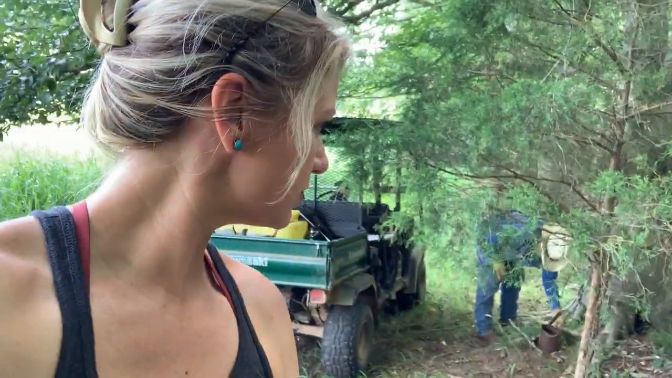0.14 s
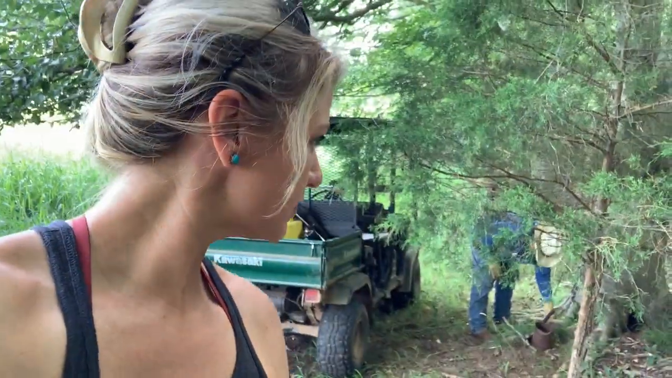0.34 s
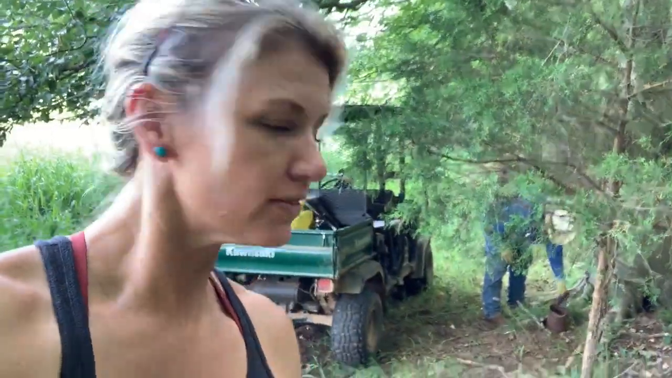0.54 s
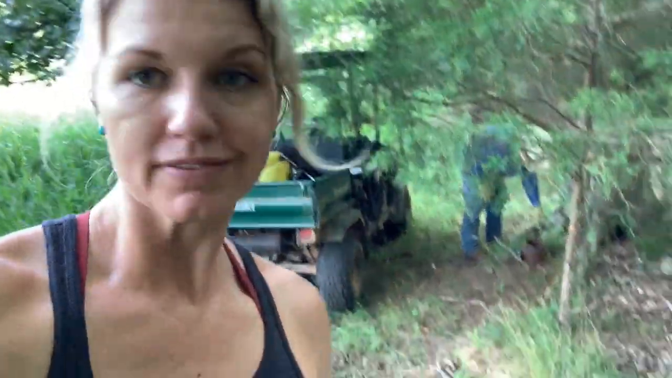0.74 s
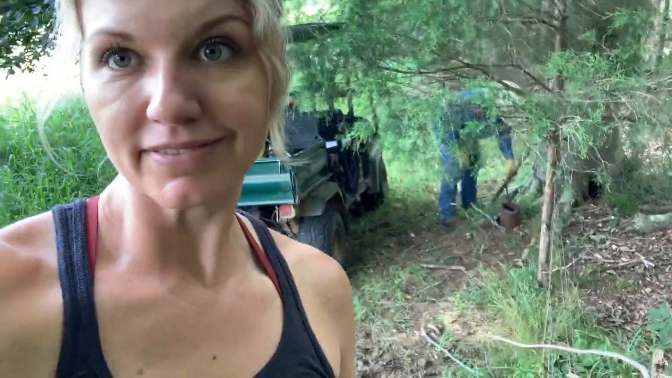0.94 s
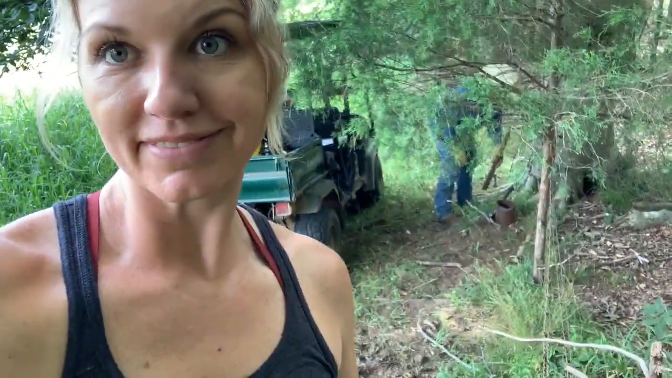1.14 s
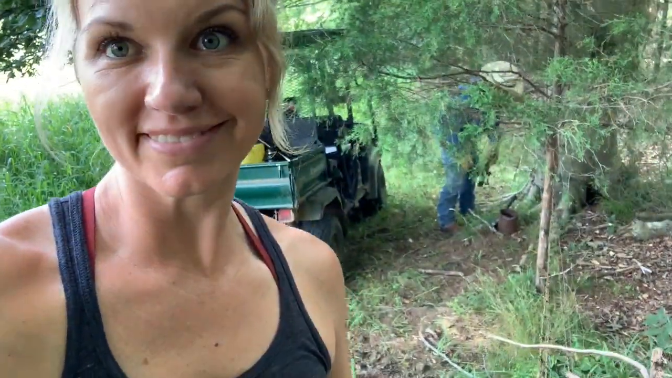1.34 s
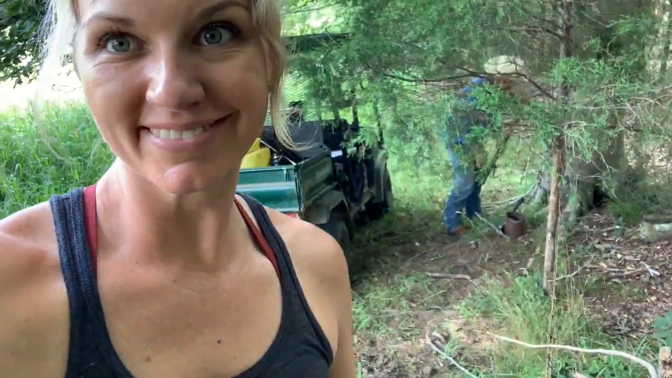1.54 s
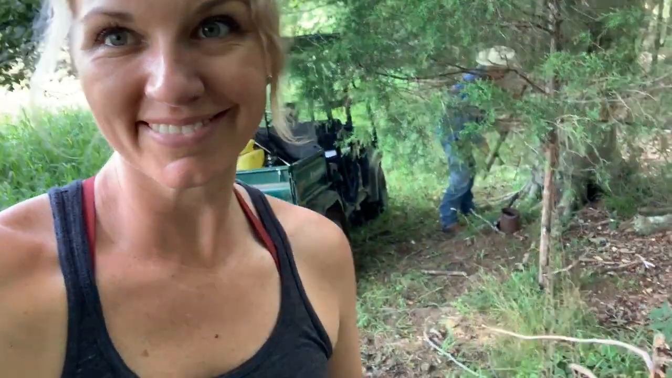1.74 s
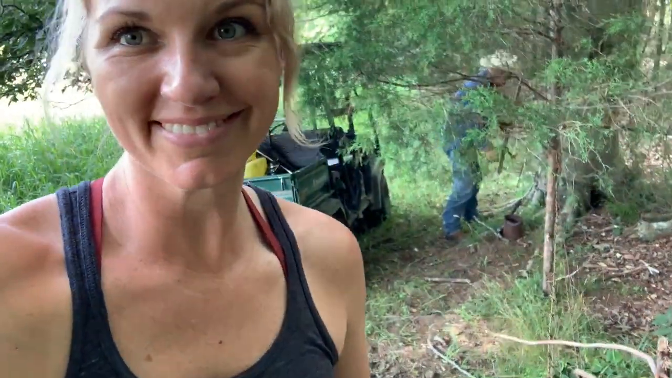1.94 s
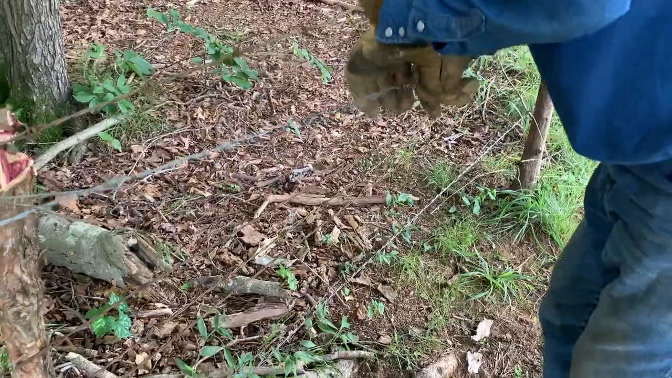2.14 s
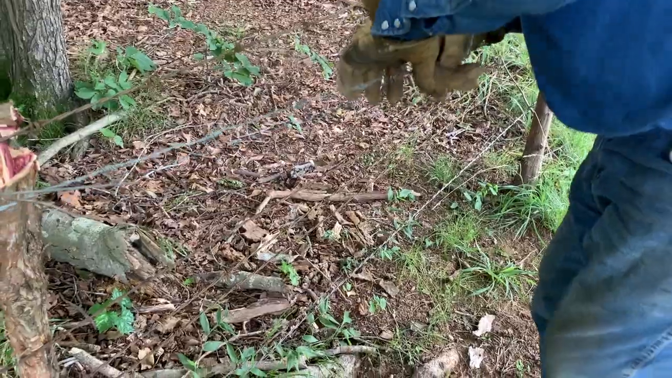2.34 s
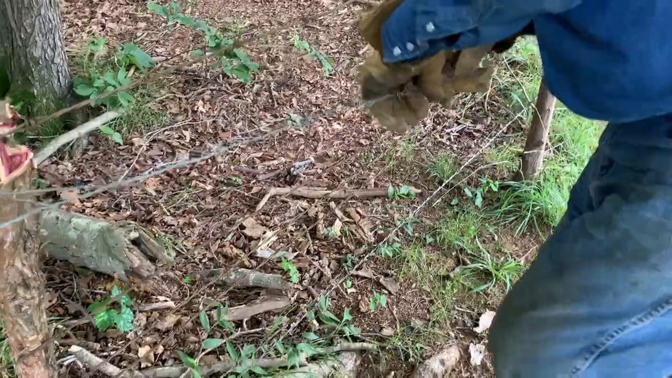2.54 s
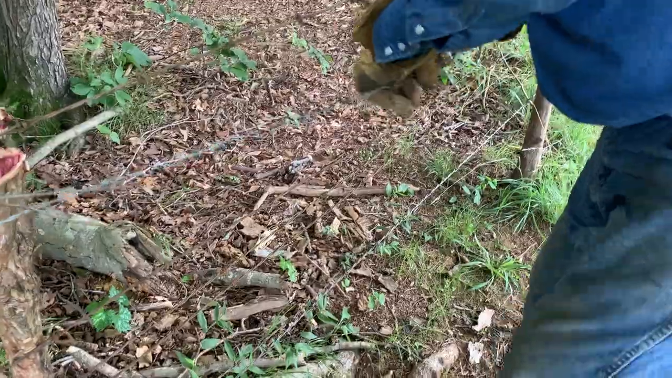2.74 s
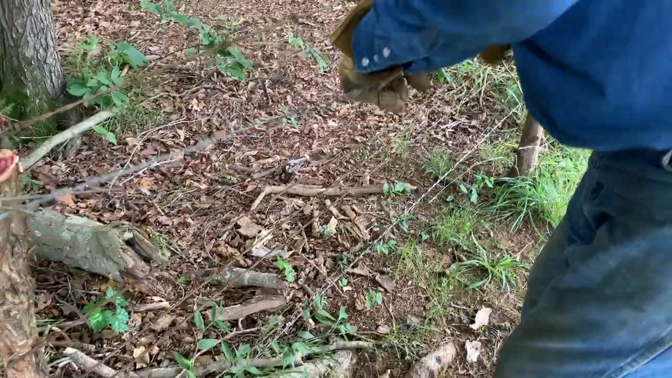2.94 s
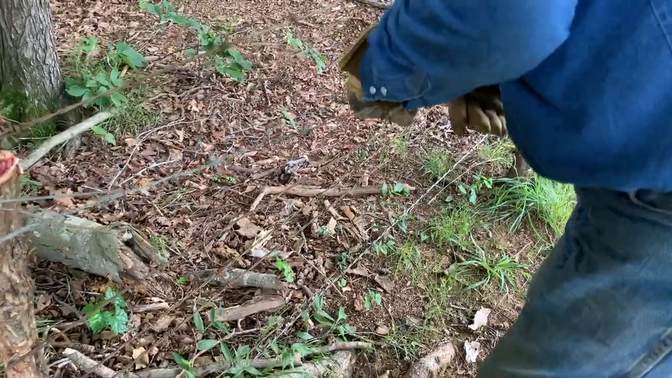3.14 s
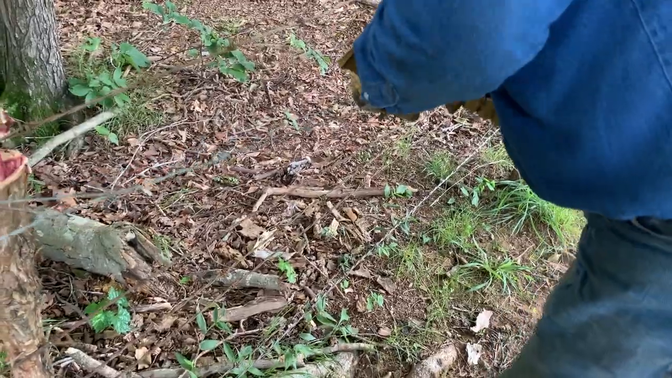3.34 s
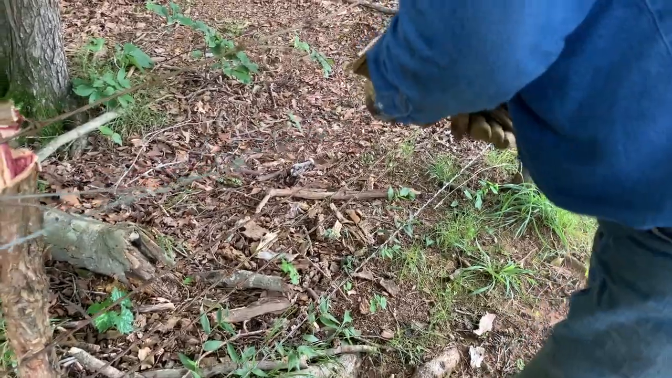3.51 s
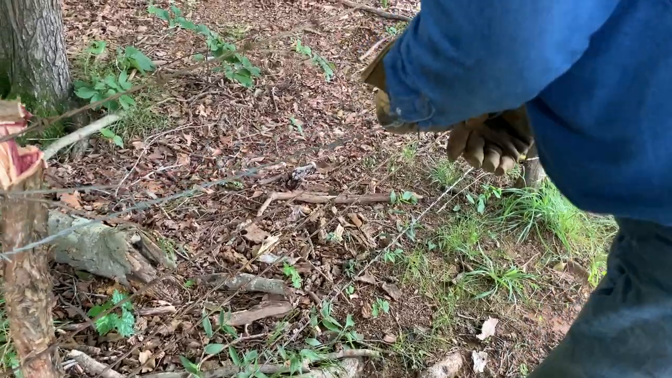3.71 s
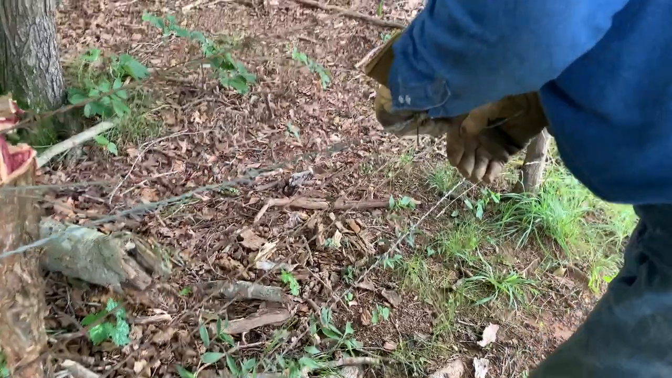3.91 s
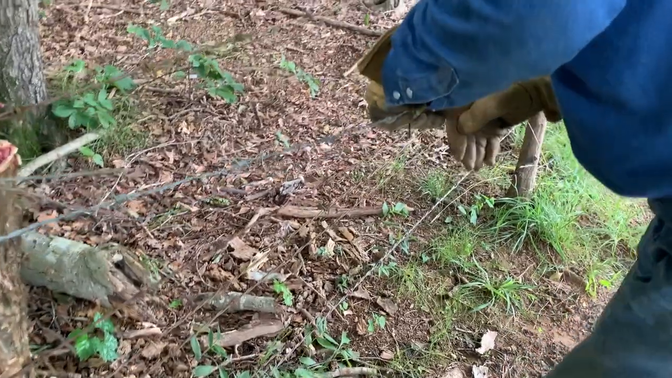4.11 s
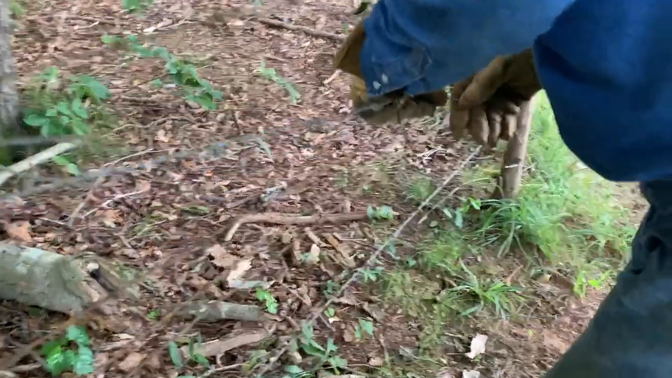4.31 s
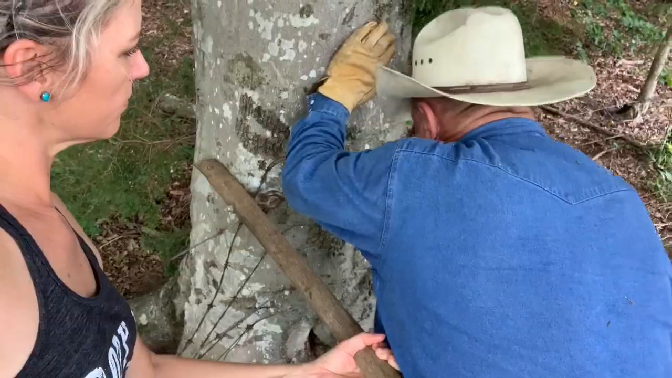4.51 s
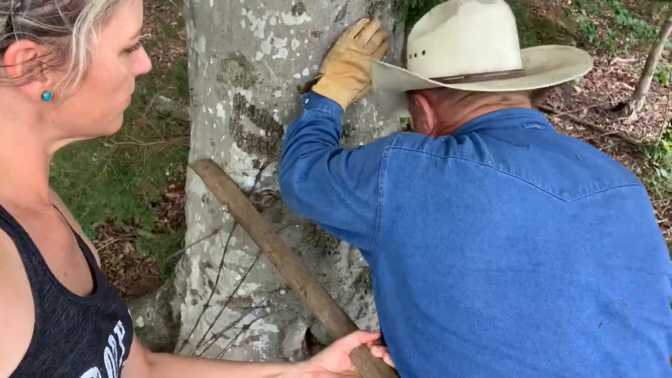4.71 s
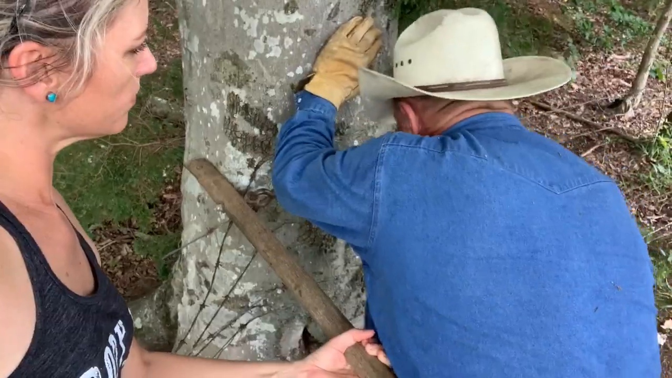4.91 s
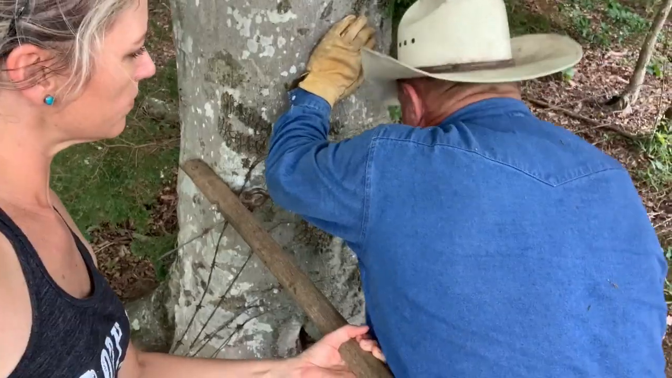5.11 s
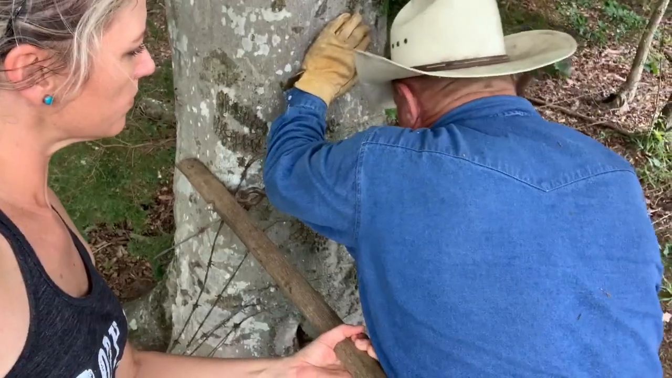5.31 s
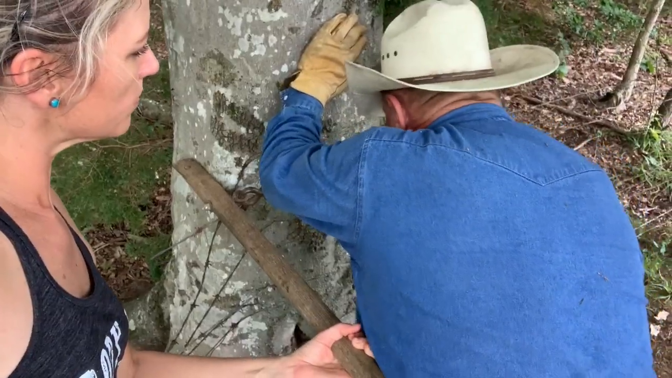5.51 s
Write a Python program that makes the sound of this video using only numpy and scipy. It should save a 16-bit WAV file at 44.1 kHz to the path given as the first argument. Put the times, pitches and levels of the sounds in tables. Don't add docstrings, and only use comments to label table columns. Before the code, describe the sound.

A quiet woodland heard through a phone in stereo, with soft air, low wind rumble and faint high insect hiss. From 0 to 0.3 s a nearer bird gives two quick dipping whistles among blurred distant birdsong; small dull wood knocks follow around 0.5 to 0.6 s. From 1.0 to 1.6 s a second phrase of whistles rises with a hoarse low call, then thin wire ticks near 1.8 to 1.9 s. At 2.0 s the scene cuts to gloved wire work: woody knocks at 2.36, 2.43 and 2.64 s, bright snapping ticks and a rustle around 2.6 to 2.8 s, another scrape near 3.3 to 3.4 s, a crisp tick at 4.0 s, birds faint behind. At 4.44 s it cuts to the ringing tail of a hammer blow. Loud, sharp steel cracks land at 5.0 and 5.6 s, with a short trunk ring and tree echo; between them only quiet air and a faint far trill.

```python
import sys
import numpy as np
from scipy import signal
from scipy.fft import rfft, irfft, next_fast_len
from scipy.io import wavfile
from scipy.ndimage import uniform_filter1d

SR = 44100
rng = np.random.default_rng(int(sys.argv[2]) if len(sys.argv) > 2 else 0)


def to_linear_factor(level_db):
    exponent = np.asarray(level_db, float) / 20
    return 10 ** exponent


def dump_mix(stems):
    frames = np.atleast_2d(stems).T
    limited = np.clip(frames, -1, 1)
    pcm = np.round(limited * 32767).astype(np.int16)
    wavfile.write(sys.argv[1], SR, pcm)


N = 249738


def evened(x):
    return x / np.sqrt(np.mean(x ** 2) + 1e-20)


def read(points, hz, column=1):
    rows = np.array(points).T
    return np.interp(np.log(hz + 1), np.log(rows[0] + 1), rows[column])


def add(mix, s, sound):
    part = mix[:, round(s * SR):][:, :sound.shape[-1]]
    part += sound[..., :part.shape[1]]


def coloured(x, points):
    size = next_fast_len(x.shape[-1])
    hz = np.fft.rfftfreq(size, 1 / SR)
    return evened(irfft(rfft(x, size) * to_linear_factor(read(points, hz)), size)[..., :x.shape[-1]])


def drift(shape, bins, frames):
    field = uniform_filter1d(rng.standard_normal(shape), bins, axis=0)
    return evened(uniform_filter1d(field, frames, axis=1))


def patchy(patchy_db, size=(6, 10)):
    z = signal.stft(rng.standard_normal((2, N)), nperseg=512)[2]
    patches = drift(z.shape[1:], *size)
    return signal.istft(z * to_linear_factor(patchy_db * patches), nperseg=512)[1][:, :N]


def resonate(x, hz, width_hz):
    turn = np.exp(2j * np.pi * np.cumsum(hz) / SR)
    r = np.exp(-np.pi * width_hz / SR)
    return 2 * (turn * signal.lfilter([1 - r], [1, -r], x / turn)).real


def blurred(level_db, hz, width_hz, patchy_db):
    hz = hz * np.ones(N)
    streaks = patchy(patchy_db, size=(3, 9))
    return to_linear_factor(level_db) * evened(resonate(resonate(streaks, hz, width_hz), hz, width_hz))


def swells(rows):
    rows, t = np.array(rows), np.arange(0, N + 64, 64) / SR
    late = t - rows[:, :1]
    db = rows[:, 1:2] - 21.5 * np.maximum(-late / rows[:, 2:3], late / rows[:, 3:4])
    last = uniform_filter1d(rows[db.argmax(axis=0), -1], size=30)
    return [np.interp(np.arange(N) / SR, t, v) for v in (db.max(axis=0), last)]


CUT_S = [2.004, 4.442]


def takes(fade_s=0.0073):
    t = np.arange(N) / SR
    first, second = (np.clip((t - s) / fade_s, 0, 1) for s in CUT_S)
    return np.array([1 - first, first - second, second])


# frequency in Hz, density in dB per Hz.
AIR_SPECTRA = [
    [(18, -81), (30, -12), (64, 0), (123, -25.5), (162, -23), (448, -24.5), (1560, -29.5), (2780, -34.5),
     (2980, -31), (7500, -32), (9750, -111), (16500, -120)],
    [(18, -29), (30, -22), (93, 2), (458, -18), (694, -32.5), (1130, -32), (1420, -20), (1710, -38),
     (4110, -23), (7500, -44), (9750, -76), (16500, -120)],
    [(18, -33), (30, 3.5), (251, -10.5), (355, -17.5), (744, -8), (1420, -26.5), (2530, -19.5),
     (3190, -22.5), (4840, -29), (7500, -38), (9750, -61.5), (16500, -120)],
]
AIR_LEVEL_DB = [-64, -60.5, -61.5]
# frequency in Hz, density in dB per Hz.
INSECT_SPECTRA = [
    [(7000, -53), (8000, -15.5), (9000, -24), (9800, 2), (10500, -13.5), (11500, -25), (13000, -13.5),
     (14500, -6), (15800, -6.5), (16100, -24)],
    [(7000, -56), (8000, -3), (9500, 5.5), (10500, 2), (12000, -35), (13500, 10.5), (15000, 9), (15800, -6),
     (16100, -64)],
    [(7000, -39.5), (8000, 0), (9500, 4.5), (11000, -9), (13000, -6), (15800, -5.5), (16100, -49.5)],
]
INSECT_LEVEL_DB = [-60.5, -72, -81]


def air():
    wash, hiss = patchy(3.1), patchy(0.96)
    out = np.zeros((2, N))
    for k, gate in enumerate(takes()):
        out += gate * to_linear_factor(AIR_LEVEL_DB[k]) * coloured(wash, AIR_SPECTRA[k])
        out += gate * to_linear_factor(INSECT_LEVEL_DB[k]) * coloured(hiss, INSECT_SPECTRA[k])
    return out


# time in seconds, level in dB.
RUMBLE_LEVEL = [(0.0, -60), (0.3, -66), (1.95, -59.5), (2.6, -59.5), (2.69, -51.5), (2.9, -61),
                (3.4, -63.5), (4.44, -59.5)]


def rumble():
    level_db = np.interp(np.arange(N) / SR, *np.transpose(RUMBLE_LEVEL))
    return to_linear_factor(level_db) * coloured(patchy(2.7), [(25, -35), (60, 0.5), (120, -3.5), (300, -17.5), (700, -41.5)])


# peak in seconds, level in dB, rise in seconds, fall in seconds.
LOW_BOUTS = [(0.3, -62.5, 0.89, 1.25), (1.45, -55, 0.2, 0.43), (2.08, -62, 0.2, 0.32),
             (3.01, -65, 0.28, 0.81), (3.83, -68, 0.33, 1)]
# peak in seconds, level in dB, rise in seconds, fall in seconds, centre in Hz.
BOUTS = [(0.0, -53.5, .1, 0.37, 3520), (0.18, -52.5, 0.16, 0.27, 3550), (1.08, -60.5, 0.03, 0.3, 4500),
         (1.2, -57.5, 0.11, 0.23, 3840), (1.37, -53, 0.063, 0.31, 3460), (1.86, -62, 0.18, 0.1, 3730),
         (2.09, -61.5, 0.078, 0.25, 3050), (2.97, -62.5, 0.14, 0.26, 4020), (3.41, -54, 0.1, 0.052, 3950),
         (3.72, -62.5, 0.1, 0.31, 3300), (3.9, -60, 0.29, 0.13, 3680), (4.26, -68.5, 0.35, 0.13, 3880)]
# peak in seconds, level in dB, rise in seconds, fall in seconds.
COOS = [(1.0, -66.5, 0.13, 0.098), (1.17, -64.5, 0.16, 0.035), (1.386, -49, 0.075, 0.035),
        (1.528, -51, 0.1, 0.12), (2.205, -65.5, 0.089, .1), (2.3, -62, .1, 0.076), (2.575, -64, .06, 0.053),
        (3.59, -67, 0.08, .06), (4.1, -71, 0.14, .15)]


def chorus():
    low = blurred(swells(LOW_BOUTS)[0], 2540, 850, 5.9)
    birds = blurred(*swells(BOUTS), 950, 4.4)
    coo = blurred(swells(COOS)[0], 1461, 210, 4.1)
    return low + birds + coo


TRILL_BOUTS = [(4.66, -76, .1, .3), (4.86, -66.5, 0.41, 0.4)]


def trill():
    return blurred(swells(TRILL_BOUTS)[0], 4650, 450, 4)


# start in seconds, level in dB.
DIP_STARTS = [
    (0.026, -45.5),
    (0.2, -45),
]
# length in seconds, start, middle and end in Hz.
DIVE_SHAPE = (0.029, 2950, 2580, 2240)
# length in seconds, start, middle and end in Hz.
CLIMB_SHAPE = (0.0382, 2150, 2900, 2700)
# start in seconds, length in seconds, start, middle and end in Hz, level in dB.
HOOK_NOTE = (1.272, .06, 2286, 2527, 2190, -49.5)
# start in seconds, length in seconds, start, middle and end in Hz, level in dB.
FALLING_CALL = [
    (1.04, .035, 6300, 5700, 5350, -64),
    (1.075, .04, 5350, 5300, 5200, -64),
]
# start in seconds, length in seconds, start and end in Hz, level in dB.
SLIDE_NOTES = [(0.45, 0.15, 3880, 4080, -66), (0.37, 0.093, 2300, 2800, -66.5),
               (1.051, 0.03, 3000, 3300, -69.5), (1.169, .05, 3300, 3500, -65),
               (1.199, 0.047, 4500, 4700, -62), (1.338, 0.012, 2390, 2970, -45.5),
               (1.372, 0.026, 3100, 2234, -44.5), (1.681, 0.05, 4870, 4800, -60),
               (1.736, .05, 4750, 4700, -64), (1.825, .025, 3900, 4200, -66),
               (1.949, .04, 6120, 5900, -65.5), (1.903, 0.053, 3340, 2750, -67),
               (2.197, 0.055, 5120, 4900, -70), (2.876, 0.058, 2620, 2950, -67),
               (3.63, 0.07, 2880, 3090, -69.5), (0.131, 0.025, 3567, 3960, -62),
               (0.179, .025, 3280, 3900, -52), (0.186, 0.033, 4090, 4390, -62),
               (1.844, 0.029, 4210, 3890, -66), (2.056, .05, 3200, 3500, -71),
               (2.224, 0.03, 4900, 4760, -62), (2.494, 0.049, 2450, 2750, -70),
               (2.959, 0.039, 3260, 2875, -65), (3.019, 0.062, 2250, 2420, -69),
               (3.695, .04, 3310, 3660, -66), (3.73, 0.057, 3300, 2600, -72), (3.82, .1, 4270, 3810, -68),
               (3.838, 0.077, 3400, 2810, -68), (4.237, 0.058, 2500, 2760, -70.5)]
# start in seconds, length in seconds, pitch in Hz, level in dB.
PIPE_NOTES = [(0.131, 0.053, 3640, -57.5), (0.005, 0.065, 3600, -60), (0.013, 0.024, 4260, -62),
              (0.216, 0.059, 4100, -64), (0.387, 0.035, 3790, -60), (1.402, 0.032, 2297, -50.5),
              (1.8, 0.095, 5300, -68), (.47, .14, 2830, -69.5), (.1, .02, 2950, -63),
              (2.265, .025, 2800, -76), (3.2, .02, 3050, -64.5), (1.412, 0.047, 5990, -61),
              (1.733, 0.05, 5960, -57.5), (2.01, 0.048, 5800, -74), (2.1, 0.108, 3500, -69),
              (2.538, 0.04, 4800, -64), (4.215, 0.054, 4080, -66), (1.129, .13, 7000, -71),
              (1.661, 0.036, 2450, -72), (1.77, .03, 2407, -65.5), (1.707, 0.047, 3050, -71),
              (2.975, 0.025, 5250, -66.5), (3.61, 0.023, 5250, -65), (4.2, .025, 5150, -69),
              (4.2, 0.08, 3530, -77), (3.4, 0.143, 3820, -72), (4.63, .06, 4780, -70),
              (4.777, .08, 4200, -70), (4.88, .09, 4750, -71), (4.705, .07, 5900, -71),
              (5.39, .16, 4100, -74.5)]


def song():
    rows = []
    for s, db in DIP_STARTS:
        rows.append((s, *DIVE_SHAPE, db))
        rows.append((s + DIVE_SHAPE[0], *CLIMB_SHAPE, db - 2.5))
    rows += [HOOK_NOTE, *FALLING_CALL]
    rows += [(s, length, a, a + 0.62 * (b - a), b, db) for s, length, a, b, db in SLIDE_NOTES]
    return rows + [(s, length, hz, hz, 0.98 * hz, db) for s, length, hz, db in PIPE_NOTES]


def notes():
    dry = np.zeros((2, N))
    for s, length, *hz, db in song():
        u = np.arange(int(length * SR)) / (length * SR)
        bend = np.polyval(np.polyfit([0, .5, 1], hz, 2), u)
        lags = rng.uniform(-1, 1) * np.array([[0], [(hz[1] / 3200) ** 2]])
        flutter = evened(uniform_filter1d(rng.standard_normal(len(u)), 120))
        flutter = to_linear_factor(np.clip(-49 - db, 0, 12) * 0.31 * flutter)
        waver = evened(uniform_filter1d(rng.standard_normal(len(u)), 200))
        bend = bend * (1 + np.clip(-50 - db, 0, 20) * 0.0009 * waver)
        whistle = np.sin(2 * np.pi * np.cumsum(bend) / SR + lags)
        add(dry, s, to_linear_factor(db) * flutter * np.sin(np.pi * u) ** 0.45 * whistle)
    t = np.arange(SR // 2) / SR
    tail = rng.standard_normal((2, len(t))) * to_linear_factor(-60 * t / .55) * (t > .012)
    tail = tail / np.linalg.norm(tail[0])
    return dry + to_linear_factor(-4) * signal.fftconvolve(dry, tail, axes=1)[:, :N]


# peak in seconds, level in dB, rise in seconds, fall in seconds, body in dB.
STROKES = [(0.146, -77.5, 0.29, 0.27, 12.5), (0.298, -71.5, 0.026, 0.4, 4.5),
           (1.3, -71.5, 0.011, 0.23, 2.5), (1.382, -75.5, 0.058, 0.13, 14.5),
           (1.552, -71.5, 0.11, 0.082, 15.5), (2.3, -71, 0.42, 0.071, 9), (2.38, -80, 0.3, 0.83, 20.5),
           (2.45, -76.5, 0.092, 0.2, 19.5), (2.65, -65, 0.27, 0.066, 6), (2.725, -58, 0.14, 0.066, 3),
           (2.775, -68.5, .03, 0.084, 2), (3.3, -69, 0.088, 0.074, 5.5), (3.36, -63.5, 0.078, .1, 12),
           (3.408, -55.5, 0.11, 0.077, 7), (3.44, -59, 0.12, 0.031, 13), (3.942, -67.5, 0.07, 0.19, 4.5)]
# frequency in Hz, density in dB per Hz.
SCRAPE_SPECTRUM = [(600, -31), (1000, -5.5), (2400, 5), (7400, -2.5), (8300, -12), (9300, 5), (12000, -9),
                   (15000, -5.5)]


def rustle():
    grain_db = 2.0 * np.repeat(np.minimum(rng.exponential(1, N // 40 + 1), 2.6), 40)[:N]
    grains = rng.standard_normal((2, N)) * to_linear_factor(grain_db)
    level_db, body_db = swells(STROKES)
    scrape = to_linear_factor(level_db + 9.0) * coloured(grains, SCRAPE_SPECTRUM)
    cloth = [(150, -32), (300, 2.0), (480, -3), (900, -12), (1600, -14.5), (2500, -42.5)]
    return scrape + to_linear_factor(level_db + body_db) * coloured(grains[::-1], cloth)


# start in seconds, peak in dB, ring in Hz, ring time in seconds, contact snap in dB.
SMALL_KNOCKS = [(0.114, -52, 1480, 0.013, -51.5), (0.357, -58.5, 1630, 0.028, -56),
                (0.516, -51.5, 390, 0.13, -65), (0.517, -60, 1300, 0.079, -66),
                (0.584, -61.5, 1280, 0.083, -76), (0.705, -65, 1420, 0.027, -60),
                (0.584, -45, 450, 0.093, -65), (0.99, -62, 2160, 0.027, -61), (0.93, -60.5, 250, 0.16, -70),
                (1.961, -47.5, 151, 0.17, -76), (2.002, -49.5, 944, 0.024, -54),
                (2.356, -40, 948, 0.03, -47), (2.432, -46, 336, 0.041, -52.5), (2.46, -57, 905, 0.035, -70),
                (2.641, -42, 372, 0.04, -49), (2.849, -53.5, 350, 0.048, -55.5),
                (2.873, -48, 885, 0.025, -51.5), (3.286, -57, 449, 0.19, -52),
                (3.645, -67, 363, 0.028, -61.5), (3.793, -62, 950, 0.031, -63),
                (3.914, -62, 1220, 0.032, -50.5)]


def knocks():
    out, t = np.zeros((2, N)), np.arange(4000) / SR
    snap_spectrum = [(300, -16), (1000, 1.0), (2200, -4.0), (4500, -11.5), (10000, -14.5)]
    for s, db, hz, t60, snap_db in SMALL_KNOCKS:
        turns = 2 * np.pi * hz * t
        overtones = np.sin(0.596 * turns) + np.sin(np.array([[1.9], [1.3]]) * turns)
        ring = np.sin(turns) + hz / 1600 * overtones
        rise = 1 - np.exp(-t * hz / 0.5)
        snap = coloured(rng.standard_normal((2, len(t))), snap_spectrum)
        snap = snap * to_linear_factor(snap_db - 60 * t / 0.041) * (1 - np.exp(-t / 0.0008))
        add(out, s, to_linear_factor(db - 60 * t / t60) * rise * ring + snap)
    return out


# start in seconds, peak in dB, centre in Hz, left-right in dB, spread as a pitch ratio.
WIRE_TICKS = [(1.817, -52.5, 3800, 6, 1.3), (1.853, -54, 3500, 6, 1.3), (1.865, -50.5, 3700, 5, 1.45),
              (1.907, -59.5, 1500, 0, 1.7), (2.5644, -49, 2650, -2, 1.9), (2.5652, -46.5, 10000, -3, 1.7),
              (2.588, -57, 2500, -6, 2.6), (2.645, -45, 5000, -5, 3.8), (2.6874, -43.5, 6400, -2, 2.1),
              (2.721, -40, 6030, 1, 2.7), (2.733, -45, 6000, 3, 2.7), (2.298, -68, 4500, 0, 2.2),
              (3.876, -61, 7000, 0, 1.6), (4.22, -58, 2200, -1, 1.6), (2.7737, -47, 10100, -1, 3),
              (2.953, -45, 8700, -1, 2.5), (3.146, -55, 12000, 0, 1.4), (3.2811, -45, 12000, -1, 2.7),
              (3.3256, -44.5, 2640, -4, 1.5), (3.352, -49, 3150, -7, 1.8), (3.9986, -44, 10700, 0, 1.5)]


def ticks():
    out, t = np.zeros((2, N)), np.arange(4000) / SR
    for s, db, hz, pan_db, spread in WIRE_TICKS:
        band = [(hz / spread ** 2, -26), (hz / spread, -7), (hz, 0), (hz * spread, -7), (hz * spread ** 2, -24)]
        snap = coloured(rng.standard_normal((2, len(t))), band)
        decay = to_linear_factor(-60 * t / 0.0073) + to_linear_factor(-11 - 60 * t / 0.095)
        add(out, s, to_linear_factor(db + np.array([[.5], [-.5]]) * pan_db) * snap * decay)
    return out


# frequency in Hz, near level in dB, near decay in seconds, far level in dB, far decay in seconds.
TREE_ECHO = [(98.4, -4, 0.15, -25, 0.7), (200.5, 7.5, 0.17, -30.5, 1.2), (540, 14, 0.087, -17, 0.96),
             (920, 2, 0.12, -17.5, 1.01), (1280, -11.5, 0.13, -31, 0.83), (2450, -7, 0.14, -27, 0.96),
             (5000, -9.5, 0.16, -22, 0.69), (8950, -7.5, 0.12, -21.5, 0.43),
             (12000, -15.5, .15, -38.5, 0.38), (15920, -28, .12, -40.5, .3)]


def trees(near_db):
    t = np.arange(SR) / SR
    hz, frames, z = signal.stft(rng.standard_normal((2, SR)), SR, nperseg=256)
    column_hz = hz[:, None]
    z = z + z[::-1] * np.exp(-column_hz / 500)
    z = z * to_linear_factor(1.5 * drift(z.shape[1:], 3, 8))
    near, far = (to_linear_factor(read(TREE_ECHO, hz, k)[:, None] - 60 * frames / read(TREE_ECHO, hz, k + 1)[:, None])
                 for k in (1, 3))
    near = to_linear_factor(near_db) * near * (1 - np.exp(-frames * column_hz / 9))
    far = far * (1 - np.exp(-frames / 0.1))
    echo = signal.istft(z * 10 * (near + far), SR, nperseg=256)[1][:, :SR]
    return echo * (1 - np.exp(-t / 0.0011))


# frequency in Hz, density in dB per Hz.
SMEAR_SPECTRUM = [(400, -22.5), (800, 0.5), (3000, -3.5), (8000, -12), (10000, -36.5)]
# frequency in Hz, density in dB per Hz.
STREAK_SPECTRUM = [(1000, -14), (1800, -8), (2400, -26), (3100, 0), (4000, -30), (5000, -4), (5700, -28),
                   (6400, -14), (7200, -28), (8000, -8), (8600, -40)]


def smear():
    t = np.arange(1300) / SR
    close = coloured(rng.standard_normal((2, 1300)), SMEAR_SPECTRUM) * to_linear_factor(14.0 - 2200 * t[::-1])
    streaks = coloured(rng.standard_normal((2, 1300)), STREAK_SPECTRUM) * to_linear_factor(-6 - 200 * t[::-1])
    return close + streaks * np.minimum(t / .005, 1)


def crack():
    u = (np.arange(100) / SR - .00115) * 3200 * np.pi
    swing = -(1 - 2 * u ** 2) * np.exp(-u ** 2)
    return np.array([swing, 0.85 * np.roll(swing, -3)])


# mode in Hz, level in dB,
# ring time in seconds, delay in seconds, left-right in dB.
TRUNK_MODES = [(123, -20.5, 0.034, 0.00329, 0.5), (233, -16.5, 0.014, 0.01108, 2.5),
               (472, -20.0, 0.018, 0.01154, 10.0), (750, -20.0, 0.044, 0.0071, 10.0),
               (238, -8.0, 0.012, 0.0021, 1.5), (466, -4.0, 0.014, 0.00296, 7.5),
               (756, 1.0, 0.023, 0.00135, 8.0), (1168, -8.5, 0.017, 0.00147, 4.5),
               (1712, -15.5, 0.006, 0.00064, 10.0), (1942, -8.5, 0.006, 0.00104, 1.0),
               (2182, -13.5, 0.025, 6e-05, 1.5), (2508, -8.5, 0.013, 0.00056, 1.0),
               (3032, -16.0, 0.012, 0.00063, -2.0), (3720, -16.5, 0.01, 0.00053, 6.0),
               (4192, -9.5, 0.008, 0.00082, -3.5), (4446, -13.5, 0.007, 0.0008, 3.5),
               (5080, -23.5, 0.006, 0.00103, 9.5), (6265, -28.0, 0.006, 0.00062, 10.0),
               (156, -30.5, 0.062, .035, 0.5), (337, -25, 0.033, 0.023, 4), (6280, -24, 0.016, 0.0005, 9),
              (7160, -25.5, .025, 0.00033, 2.5), (8040, -28, 0.03, .001, -8.5),
              (4870, -26, .02, 0.00085, 0)]


def trunk(pitch):
    t = np.arange(SR // 3) / SR
    out = np.zeros((2, len(t)))
    for hz, db, t60, late_s, pan_db in TRUNK_MODES:
        u = np.maximum(t - late_s, 0)
        swell = 1 - np.exp(-(u * hz / 0.93) ** 2)
        lag = np.array([[0], [hz * .00007]])
        held = np.maximum(u - 1.3 / hz, 0)
        decay = to_linear_factor(-60 * (held / t60) ** 1.18)
        ring = swell * decay * np.sin(2 * np.pi * (hz * pitch * u + lag))
        out += to_linear_factor(db + np.array([[.5], [-.5]]) * pan_db) * ring
    return out


# start in seconds, pitch in Hz, level in dB, ring time in seconds.
TRUNK_HUM = [
    (4.452, 110, -38.5, 0.146),
    (4.446, 727, -46, 0.1),
    (4.444, 395, -37.5, 0.075),
    (5.3, 460, -49, .1),
]


def hum():
    out, t = np.zeros((2, N)), np.arange(SR) / SR
    for s, hz, db, t60 in TRUNK_HUM:
        add(out, s, to_linear_factor(db - 60 * t / t60) * (1 - np.exp(-t * hz / 1.9)) * np.sin(2 * np.pi * hz * t))
    return out


# time in seconds, strength in dB, pitch factor, near echo in dB.
HAMMER_BLOWS = [
    (4.412, -4, 1.03, -1.5),
    (5.0116, -2.8, 1, -0.5),
    (5.6129, -3.2, 1, 0),
]


def hammer():
    out = hum()
    for s, strength_db, pitch, near_db in HAMMER_BLOWS:
        add(out, s, to_linear_factor(strength_db) * trunk(pitch))
        add(out, s, to_linear_factor(strength_db - 4.5) * crack())
        add(out, s - 1300 / SR, to_linear_factor(strength_db - 35.5) * smear())
        add(out, s, to_linear_factor(strength_db - 27.5) * trees(near_db))
    return out * takes()[2]


def scene():
    woods = rumble() + chorus() + rustle() + knocks() + ticks()
    return air() + trill() + notes() + woods * (1 - takes()[2]) + hammer()


def holes(z, percent=8):
    count = z.shape[2] // 5
    power = (abs(z[:, 22:92, :count * 5].reshape(2, 14, 5, count, 5)) ** 2).mean((2, 4))
    below = np.log(power[:, :5].mean(1, keepdims=True))
    margin = np.log(power[:, 6:]) - .62 * below
    margin = margin - 0.86 * np.median(margin, axis=2, keepdims=True)
    strong = margin > np.percentile(margin, percent)
    keep = np.ones(z.shape)
    keep[:, 52:92, :count * 5] = np.repeat(np.repeat(strong, 5, axis=1), 5, axis=2)
    return z * keep


# frequency in Hz, side minus mid in dB.
PORT_BALANCE = [
    [(60, -9), (250, -1.5), (1300, -2), (5500, 2.5), (6500, -3), (7300, 8), (8600, 9), (9700, 15.5),
     (10900, 18), (11800, -8), (12700, -40), (14600, -47), (15300, -3)],
    [(60, -11.5), (210, 7.5), (500, -1.5), (1400, 0.5), (6000, 0.5), (6700, -4.5), (7500, 4.5), (7900, 13),
     (8900, 17), (9300, 5.5), (10200, -8), (10600, -21), (11700, -48), (12300, 4), (12900, 30), (13700, 36),
     (14000, 6), (15000, -7), (15400, -17)],
    [(60, -9.5), (200, 0), (7500, 0), (8600, 26), (9500, 26), (10600, 9.5), (11600, -8.5), (12600, -25),
     (16000, -24.5)],
]
BASS_LEAD = [-.3, .3, .1]


def ports(dry):
    mid_side = np.array([dry[0] + dry[1], dry[0] - dry[1]]) / 2
    hz, t, z = signal.stft(mid_side, SR, nperseg=512)
    take = np.searchsorted(CUT_S, t)
    ratio = to_linear_factor(np.array([read(p, hz) for p in PORT_BALANCE]).T[:, take])
    share = np.sqrt(2 / (1 + ratio ** 2))
    z = holes(z) * np.array([share, share * ratio])
    z[1] += 1j * np.exp(-hz / 200)[:, None] * np.array(BASS_LEAD)[take] * z[0]
    mid, side = signal.istft(z, SR, nperseg=512)[1][:, :N]
    return np.array([mid + side, mid - side])


# frequency in Hz, gain in dB.
MICROPHONE_RESPONSE = [(20, -20), (50, 0), (15850, 0.5), (16050, -35), (16900, -38), (17100, -90.5)]


def microphone(x):
    size = next_fast_len(N)
    gain = to_linear_factor(read(MICROPHONE_RESPONSE, np.fft.rfftfreq(size, 1 / SR)))
    return irfft(rfft(x, size) * gain, size)[:, :N]


def low_pass(x):
    return signal.sosfilt(signal.butter(12, 16990, fs=SR, output="sos"), x)


def record(dry):
    limited = np.tanh(ports(dry))
    return low_pass(microphone(limited))


dry = scene()
out = record(dry)
dump_mix(out)
```